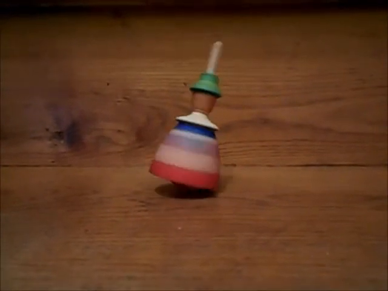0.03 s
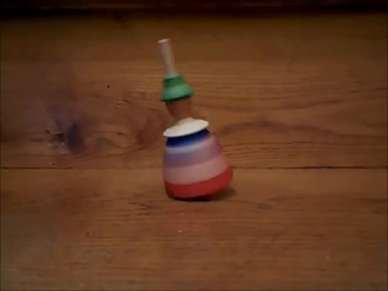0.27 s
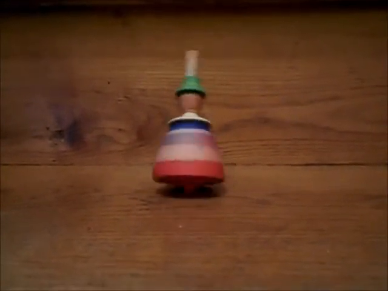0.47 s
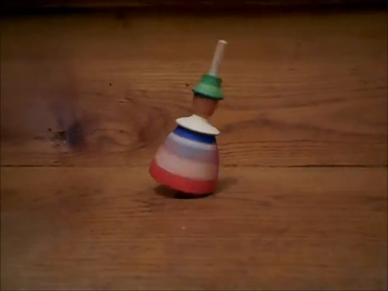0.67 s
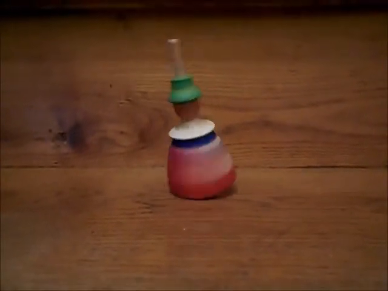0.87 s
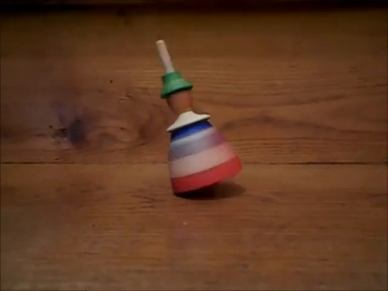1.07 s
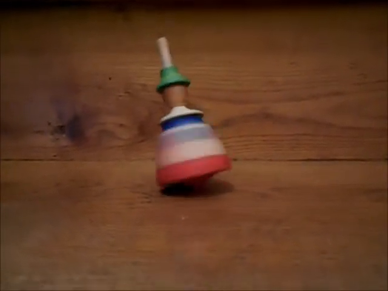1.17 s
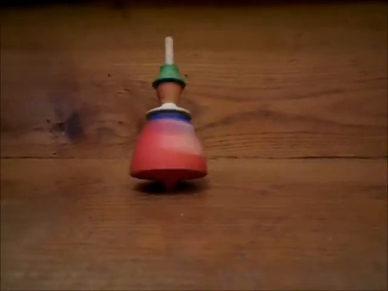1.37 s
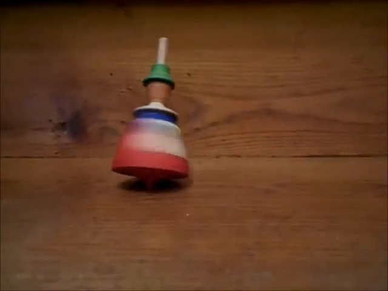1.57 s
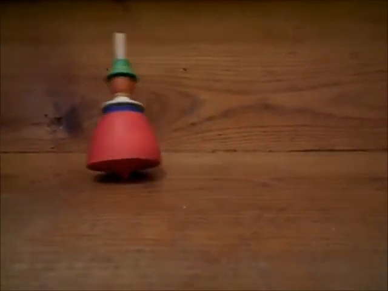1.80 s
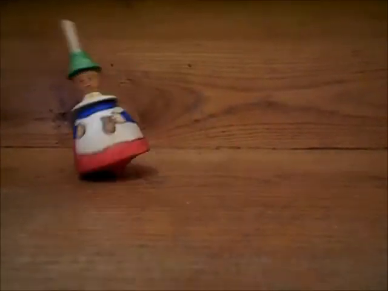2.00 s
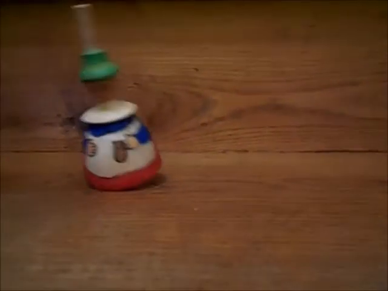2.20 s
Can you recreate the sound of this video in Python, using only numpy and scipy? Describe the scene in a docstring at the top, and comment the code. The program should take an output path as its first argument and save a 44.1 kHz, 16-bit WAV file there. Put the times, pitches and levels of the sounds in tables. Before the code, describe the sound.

A wooden spinning top wobbles on a wooden floor, heard close in a small room. After near quiet with a brief faint rumble, a knock lands at 0.2 s, another at 0.4. Irregular woody thuds and clacks with crisp ticks quicken, strongest around 1.1-1.3 s, then crowd into a low rolling, scraping clatter until 1.95. One faint tick at 2.1, then soft hiss over steady low noise.

```python
"""On a wooden floor, close to a wooden back wall, a wooden spinning top loses its balance.
Its rim knocks faster and faster: each knock is a thud of the board, a clack of the body and a contact tick.
Between knocks it rolls and scrapes into a low clatter, then settles on its tip; a small room rings.
Thuds and clacks are decaying resonances, ticks and scrapes are short noise; a few faint, wavering
high tones, a soft hiss and a steady noise floor lie beneath."""
import sys
import numpy as np
from scipy import signal
from scipy.fft import rfft, irfft
from scipy.io import wavfile
from scipy.ndimage import uniform_filter1d, map_coordinates

SR = 44100
rng = np.random.default_rng(int(sys.argv[2]) if len(sys.argv) > 2 else 0)


def generate_wav(sig):
    """Save sig (samples, or channels by samples) to the path in sys.argv[1] as 16-bit PCM at SR."""
    pcm = np.round(np.clip(np.atleast_2d(sig).T, -1, 1) * 32767).astype(np.int16)
    wavfile.write(sys.argv[1], SR, pcm)


N = 99225  # length in samples

# The strikes of the rim. Each row: time in seconds, then the levels in dB of the contact tick,
# the body clack and the board thud, each before the gain of its kind below.
RIM_STRIKES = [(0.2162, -24.5, -34.5, -31.5), (0.2175, -25.5, -19, -22), (0.401, -22.5, -41, -33),
               (0.4049, -30, -21, -21.5), (0.4767, -35.5, -29.5, -29), (0.4815, -18.5, -39, -40),
               (0.5182, -19, -25.5, -19.5), (0.6058, -29.5, -23, -21.5), (0.6415, -29, -13.5, -17.5),
               (0.7652, -26, -21.5, -18), (0.8119, -17.5, -16, -17.5), (0.8864, -17.5, -26, -27),
               (0.9195, -18.5, -21, -17), (0.9858, -27, -24.5, -23), (0.9953, -18.5, -22.5, -19.5),
               (1.048, -26.5, -24, -21.5), (1.071, -27.5, -19.5, -21), (1.1102, -27.5, -15, -16),
               (1.1756, -24, -11, -15), (1.2384, -32, -13.5, -21.5), (1.261, -22.5, -15.5, -17),
               (1.297, -25, -22, -25), (1.3199, -33, -16, -19), (1.3611, -23.5, -19, -19.5),
               (1.3863, -22.5, -39, -25), (1.3901, -28.5, -32, -36), (1.3964, -24, -27, -22.5),
               (1.4366, -20.5, -30.5, -27), (1.449, -26.5, -31, -29), (1.457, -29.5, -47, -30.5),
               (1.4662, -33, -38.5, -26.5), (1.4766, -22, -29, -27), (1.484, -24.5, -40, -40),
               (1.5012, -17, -19, -18), (1.531, -26, -20, -18.5), (1.555, -22, -18, -20),
               (1.5743, -27, -31, -22.5), (1.579, -29, -29, -26.5), (1.588, -24, -33, -38),
               (1.5986, -22, -19.5, -21.5), (1.629, -21.5, -26.5, -26.5), (1.663, -26.5, -31, -31.5),
               (1.6681, -24.5, -39, -36), (1.678, -36, -39, -43), (1.683, -28, -43, -32),
               (1.692, -32, -31, -31), (1.717, -29, -24, -25.5), (1.7308, -22.5, -15, -17.5),
               (1.7597, -25, -29, -19.5), (1.7787, -31, -30, -19), (1.805, -40, -30, -21.5),
               (1.8113, -27.5, -34, -22), (1.8271, -39, -27.5, -24), (1.8396, -27, -50, -25.5),
               (1.8617, -25, -39, -35), (1.8744, -35, -32.5, -24), (1.8991, -42, -21, -21),
               (1.9152, -27, -27.5, -24.5), (1.9216, -32, -37, -26.5), (1.9517, -52, -33, -28.5),
               (2.1224, -30.5, -43, -67)]
TICK_GAIN_DB, CLACK_GAIN_DB, THUD_GAIN_DB = 7.5, 20, 20
TICK_DECAY_S = .002
CHATTER_PER_S, CHATTER_DB, CHATTER_DECAY_S = 450, -14, .006


def knocks():
    """Each strike pushes the board and the body and makes a short crack that breaks up into chatter."""
    at, tick_db, clack_db, thud_db = np.array(RIM_STRIKES).T
    t = np.arange(SR // 10) / SR
    board_push = pushes(at, undb(thud_db + THUD_GAIN_DB))
    body_push = pushes(at, undb(clack_db + CLACK_GAIN_DB))
    touch = pushes(at, undb(tick_db + TICK_GAIN_DB))
    crack_envelope = ring(touch, np.sqrt(t) * np.exp(-t / TICK_DECAY_S))
    crack = crack_envelope * rng.standard_normal(N)
    chatter_envelope = ring(touch, t * np.exp(-t / CHATTER_DECAY_S))
    chatter = chatter_envelope * bumps(CHATTER_PER_S)
    return board_push, body_push, crack + undb(CHATTER_DB) * chatter


# The rolling of the rim between strikes.
# Each row: time in seconds, rumble level in dB (of the bumps' push), scrape level in dB.
ROLLING_LEVELS = [(0, -29.5, -54), (0.038, -77, -87), (.38, -47, -79), (.5, -59, -58), (0.543, -27, -74),
                  (.58, -73, -62), (0.741, -42.5, -60), (.94, -40, -55.5), (1.029, -59, -66),
                  (1.221, -32, -54), (1.369, -30.5, -58), (1.44, -41, -62), (1.55, -37.5, -61.5),
                  (1.699, -33, -47.5), (1.78, -30, -61), (1.87, -50, -49.5), (1.979, -33, -54.5),
                  (2.025, -49, -55.5), (2.25, -56.5, -55)]
BUMPS_PER_S, SCRAPES_PER_S = 600, 320
ROLL_SOFT_HZ = 520  # above this the soft contact weakens the bumps
ROLL_BODY_DB = -4.5  # push on the body, relative to the push on the board


def rolling():
    """Soft bumps push the board and the body; the rim scrapes in tiny ticks."""
    at, rumble_db, scrape_db = np.array(ROLLING_LEVELS).T
    t = np.arange(N) / SR
    pole = np.exp(-2 * np.pi * ROLL_SOFT_HZ / SR)
    soft_bumps = signal.lfilter([1 - pole], [1, -pole], bumps(BUMPS_PER_S))
    force = soft_bumps * undb(np.interp(t, at, rumble_db))
    # squared bumps are all positive, so they can open the noise for a moment each
    grit = ring(bumps(SCRAPES_PER_S) ** 2, np.exp(-t[:SR // 20] / TICK_DECAY_S))
    scrape = unit(grit * rng.standard_normal(N)) * undb(np.interp(t, at, scrape_db))
    return force, undb(ROLL_BODY_DB) * force, scrape


BUMP_SCATTER_DB = 1.5


def bumps(per_s):
    """Random small contacts of the rim with the wood grain."""
    hit = rng.random(N) < per_s / SR
    sign = rng.choice([-1, 1], N)
    size = undb(BUMP_SCATTER_DB * np.clip(rng.standard_normal(N), -2, 2))
    return unit(hit * sign * size)


def pushes(times, sizes):
    """One impulse per contact."""
    sample = np.clip(times * SR, 0, N - 1).astype(int)
    return np.bincount(sample, sizes, N)


# The clear resonances of the board. Each row: frequency in Hz, relative level in dB.
BOARD_MODES = [(165, -8.5), (213, -5.5), (238, -5), (303, -17), (362, -10.5), (436, 0.5), (534, 4),
               (566, 1.5), (612, -9), (775, 3.5), (820, -1), (940, -1), (982, 1.5), (1114, 2), (1275, -2.5)]
# The colour of the board's many weak, overlapping resonances. Each row: frequency in Hz, relative level in dB.
BOARD_GRAIN = [(120, -14), (230, -1), (500, -1), (1000, 0.5), (1400, -8.5), (2500, -42)]
GRAIN_DB, GRAIN_DECAY_S = -3, .007
BOARD_CYCLES = 38  # cycles in which a resonance falls by 60 dB
BEND_S, BEND_HZ = .002, 1000  # bending waves take this long to cross the board at this frequency


def board(force):
    """A few clear resonances stand over a dull, quickly dying crowd of weak ones."""
    t = np.arange(SR // 10) / SR

    def crowd_response():
        return rng.standard_normal(len(t)) * np.sqrt(t) * np.exp(-t / GRAIN_DECAY_S)
    crowd = wander(force, crowd_response, count=40)
    clear = modes(force, BOARD_MODES, BOARD_CYCLES, BEND_S)
    return clear + undb(GRAIN_DB) * colour(crowd, BOARD_GRAIN)


# The resonances of the top's body. Each row: frequency in Hz, relative level in dB.
BODY_MODES = [(965, 8), (1330, 3), (1540, 13.5), (1625, 11), (1690, 11), (1890, 8.5), (2180, -4.5),
              (2350, -11.5), (2500, -15.5)]
BODY_CYCLES = 23  # cycles in which a resonance falls by 60 dB


def body(force):
    """The wooden body answers a push with short resonances, the clack."""
    return modes(force, BODY_MODES, BODY_CYCLES, 0)


# The colour of the contact tick. Each row: frequency in Hz, relative level in dB.
TICK_COLOUR = [(400, -12), (1000, 1.5), (2500, 2), (3300, 0), (4200, 6), (5000, 1), (5900, 5.5), (6700, 2),
               (7500, -3), (9000, -2.5), (11000, -10.5)]
# The high resonances of the rim. Each row: frequency in Hz, relative level in dB.
RIM_MODES = [(3250, 9.5), (4100, 5), (5750, 12.5), (6020, -13), (6650, -53), (8600, -20)]
RIM_DB, RIM_CYCLES = -5.5, 70  # level; cycles in which a resonance falls by 60 dB


def contact(crack):
    """The coloured noise of the contact, which also makes the rim ring."""
    return colour(crack, TICK_COLOUR) + undb(RIM_DB) * modes(crack, RIM_MODES, RIM_CYCLES, 0)


SPOT_DETUNE, SPOT_SCATTER_DB = .002, 0.63  # how far each spot shifts pitch (a fraction) and level
DISPERSION_S = .0022  # longest random extra delay of a resonance


def modes(force, table, cycles, travel_s):
    """Resonances that die in so many cycles, low ones travelling longest; each spot shifts them a little."""
    hz, db = np.array(table).T[:, :, None]
    t = np.arange(SR // 4) / SR

    def response():
        weight, detune = rng.standard_normal((2, len(hz), 1))
        delay = travel_s * np.sqrt(BEND_HZ / hz) + DISPERSION_S * rng.random((len(hz), 1))
        age = np.maximum(t - delay, 0)
        tone = np.sin(2 * np.pi * hz * (1 + SPOT_DETUNE * detune) * age)
        fade = np.exp(-np.log(1000) * age * hz / cycles)
        level = undb(db + SPOT_SCATTER_DB * weight) * np.sqrt(hz)
        return np.sum(level * tone * fade, axis=0)
    return wander(force, response, count=30)


def wander(x, response, count):
    """The top moves about: each stretch of x passes through a fresh response() of unit energy."""
    out = np.zeros(N + SR)
    for part in np.array_split(np.arange(N), count):
        h = response()
        y = signal.fftconvolve(x[part], h / np.linalg.norm(h))
        out[part[0]:part[0] + len(y)] += y
    return out[:N]


# The faint high tones.
# Each row: start in seconds, starting pitch in Hz, level in dB, rise in seconds, decay in seconds.
HIGH_TONES = [(0, 7320, -58.5, 0.0056, 0.053), (0.055, 4660, -50, 0.027, 0.073),
              (0.609, 5170, -58, 0.038, 0.25)]
TONE_SAG_HZ_PER_S = 540


def high_tone(at, hz, db, rise_s, decay_s):
    """A faint high tone for a moment, wavering and sagging slightly in pitch."""
    t = np.arange(N) / SR - at
    waver = unit(uniform_filter1d(rng.standard_normal(N), size=300))
    pitch_hz = hz * (1 + 0.0075 * waver) - TONE_SAG_HZ_PER_S * t
    tone = np.sin(2 * np.pi * np.cumsum(pitch_hz) / SR)
    rise = np.clip(t / rise_s, 0, 1)
    fade = np.exp(-np.maximum(t - rise_s, 0) / decay_s)
    return undb(db) * tone * rise * fade


WALL_S, SECOND_SLAP_DB = 0.003175, -17.5  # delay of each slap; second slap relative to the first
FAR_WALL_S, FAR_WALL_DB = 0.014, -18.5
BOARD_CUT_HZ, BASS_CUT_HZ = 340, 175


def heard(x, wall_db, room_db):
    """Direct sound, two slaps between back wall and floor, a farther wall; the lows arrive through the room."""
    slap = echo(x, WALL_S, wall_db)
    second_slap = echo(slap, WALL_S, SECOND_SLAP_DB)
    near = (x + slap + second_slap) / np.hypot(1, undb(wall_db))
    early = low_cut(near + echo(near, FAR_WALL_S, FAR_WALL_DB), BOARD_CUT_HZ, order=2)
    return low_cut(early + undb(room_db) * room(near), BASS_CUT_HZ, order=4)


def echo(x, lag_s, db):
    """A copy that arrives later, at its own level."""
    return undb(db) * map_coordinates(x, [np.arange(N) - lag_s * SR], order=1)


# The decay of the room. Each row: frequency in Hz, time to fall by 60 dB in seconds.
ROOM_DECAY = [(150, 0.26), (400, 0.3), (1000, 0.18), (2800, 0.22), (7300, 0.059)]
ROOM_GAP_S = 0.0037  # silence before the tail, and again the time it takes to build up


def room(x):
    """Diffuse tail of noise bands, each fading at its own rate, the highest one fastest."""
    t = np.arange(SR // 3) / SR
    hz, t60 = np.array(ROOM_DECAY).T
    log_f = np.log(np.maximum(np.fft.rfftfreq(len(t), 1 / SR), 1))
    # overlapping bands that together cover all frequencies
    bands = np.array([np.interp(log_f, np.log(hz), share) for share in np.eye(len(hz))])
    build_up = np.clip(t / ROOM_GAP_S - 1, 0, 1)
    fade = np.exp(-np.log(1000) * t / t60[:, None]) / np.sqrt(t60[:, None]) * build_up

    def response():
        noise = rfft(rng.standard_normal(len(t)))
        return np.sum(fade * irfft(bands * noise, len(t)), axis=0)
    return wander(x, response, count=24)


# The level of the hiss over time. Each row: time in seconds, level in dB.
HISS_LEVEL = [(0, -67.5), (.2, -68), (1.76, -77.5), (1.82, -49.5), (1.89, -76), (1.96, -53), (2.058, -67),
              (2.159, -62), (2.25, -55.5)]
# The colour of the hiss. Each row: frequency in Hz, relative level in dB.
HISS_TINT = [(3000, -10), (6000, -1), (7500, 11.5), (9500, 11), (11000, -3)]


def hiss():
    """A soft high hiss, noise that swells and dips as the top settles."""
    level = undb(np.interp(np.arange(N) / SR, *np.array(HISS_LEVEL).T))
    return level * colour(rng.standard_normal(N), HISS_TINT)


# The colour of the steady noise floor. Each row: frequency in Hz, relative level in dB.
FLOOR_COLOUR = [(15, -34), (25, 12.5), (322, 9), (651, 2.5), (1050, 4), (1690, 5), (2650, -8.5),
                (4600, -7.5), (5080, -10.5), (10000, -19.5), (13000, -104), (22000, -120)]
FLOOR_DB = -49


def noise_floor():
    """Steady coloured noise beneath everything."""
    return undb(FLOOR_DB) * unit(colour(rng.standard_normal(N), FLOOR_COLOUR))


def undb(db):
    """Turn dB into a plain factor."""
    return 10 ** (np.asarray(db) / 20)


def unit(x):
    """Scale to rms 1."""
    return x / np.sqrt(np.mean(x ** 2))


def colour(x, points):
    """Filter by (Hz, dB) points, keeping the power of white noise."""
    hz, db = np.array(points).T
    f = np.maximum(np.fft.rfftfreq(len(x), 1 / SR), 1)
    gain = unit(undb(np.interp(np.log(f), np.log(hz), db)))
    return irfft(rfft(x) * gain, len(x))


def ring(x, response):
    """Pass x through a response of unit energy."""
    return signal.fftconvolve(x, response / np.linalg.norm(response))[:N]


def low_cut(x, hz, order):
    """Thin out the bass."""
    return signal.sosfilt(signal.butter(order, hz, "high", fs=SR, output="sos"), x)


def scene():
    """Knocks and rolling drive board, body and rim, heard over a quiet room."""
    on_board, on_body, crack = np.array(knocks()) + np.array(rolling())
    thud = heard(board(on_board), wall_db=-18.5, room_db=-4)
    clack = heard(body(on_body), wall_db=5, room_db=-11)  # here the slap is stronger than the direct sound
    tick = heard(contact(crack), wall_db=-17, room_db=-12)
    tones = sum(high_tone(*row) for row in HIGH_TONES)
    return (thud + clack + tick + tones + hiss() + noise_floor())[None]


TOP_HZ = 10600


def record(dry):
    """The recorder steeply cuts everything above TOP_HZ, about the top octave."""
    return signal.sosfilt(signal.ellip(10, .2, 80, TOP_HZ, fs=SR, output="sos"), dry)


dry = scene()
out = record(dry)
generate_wav(out)
```